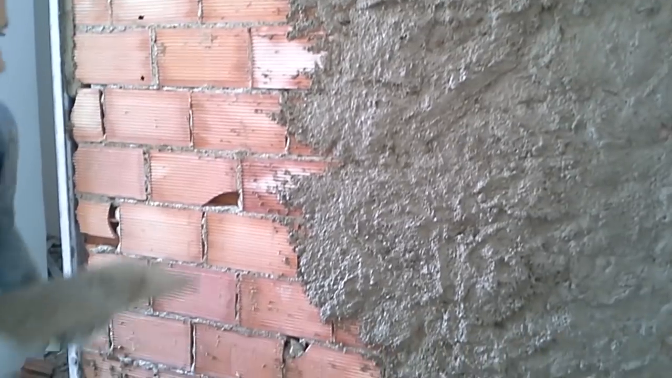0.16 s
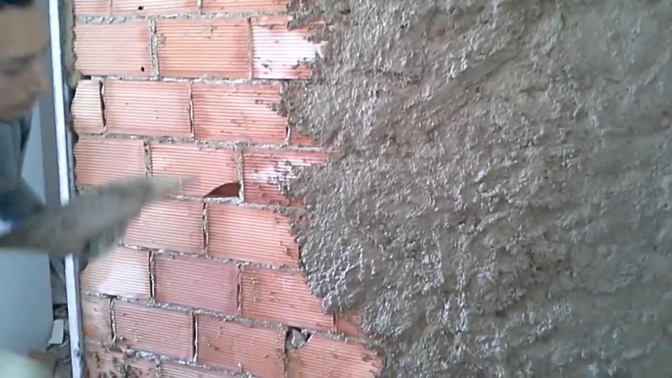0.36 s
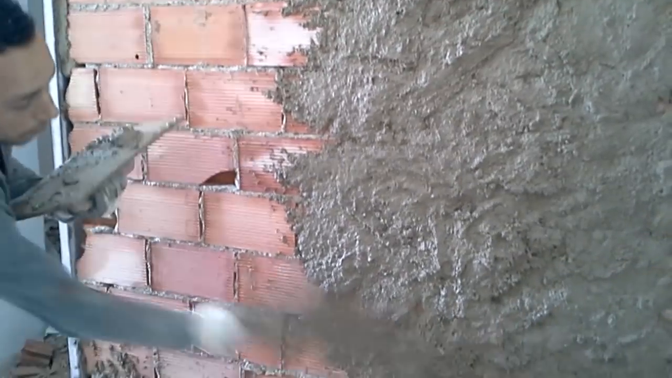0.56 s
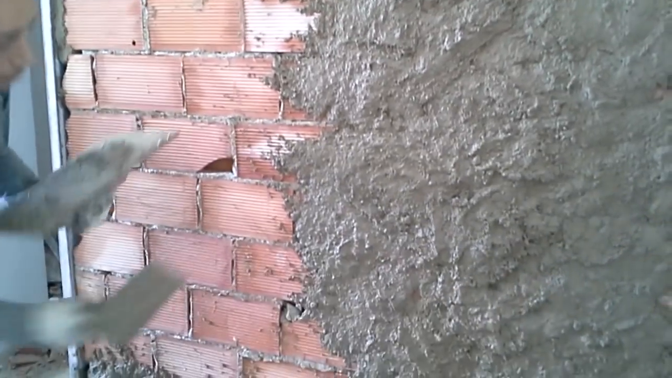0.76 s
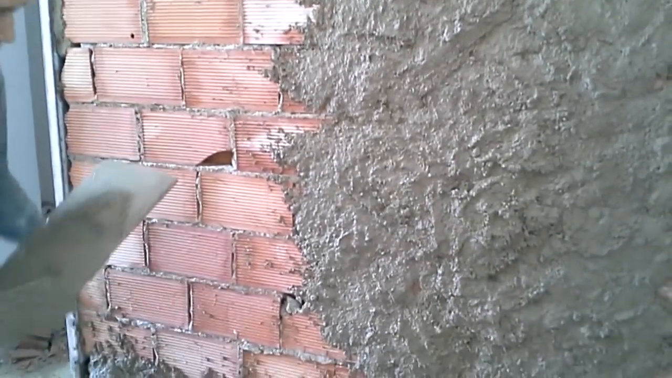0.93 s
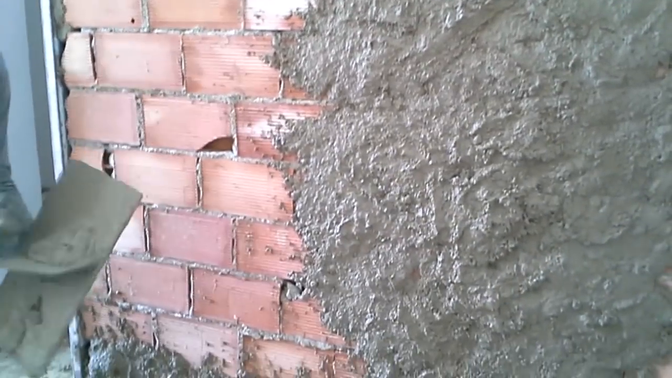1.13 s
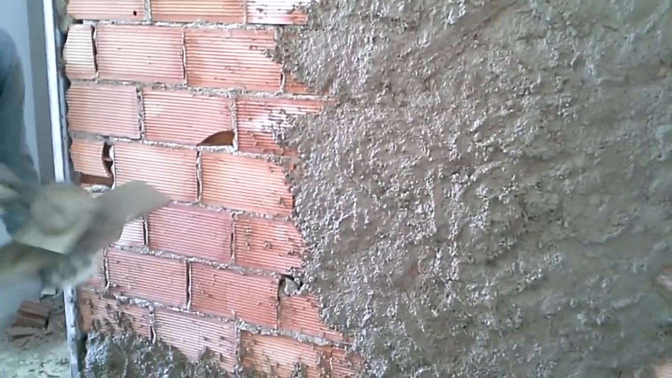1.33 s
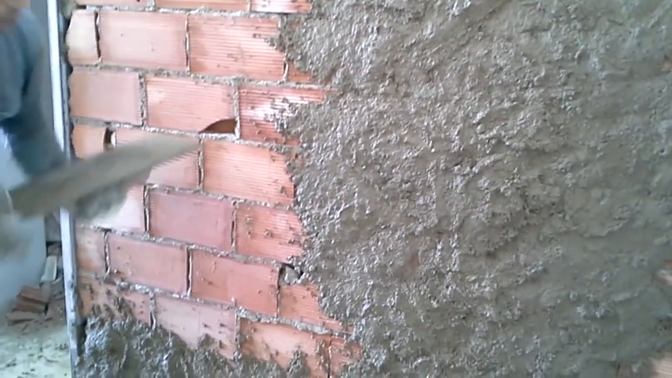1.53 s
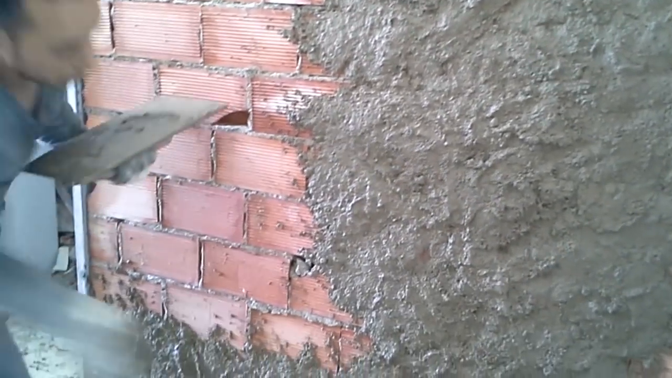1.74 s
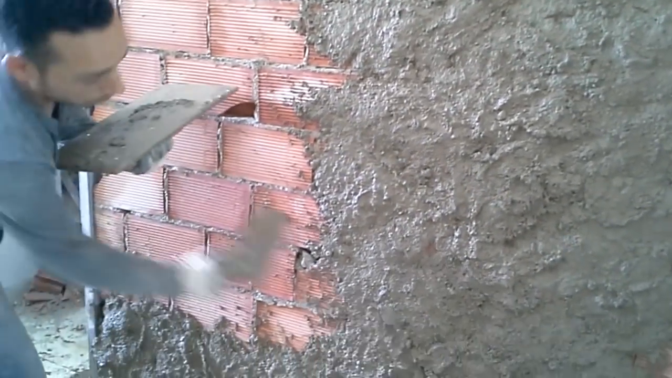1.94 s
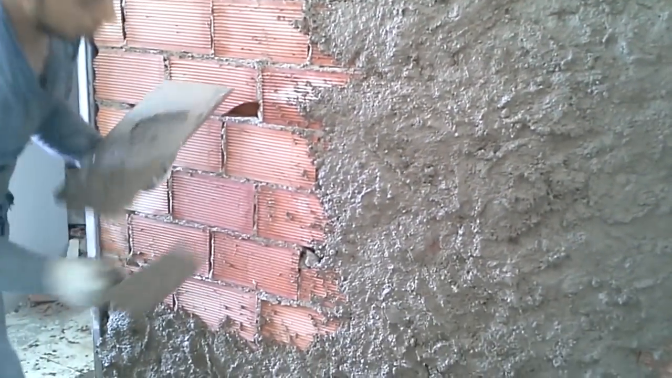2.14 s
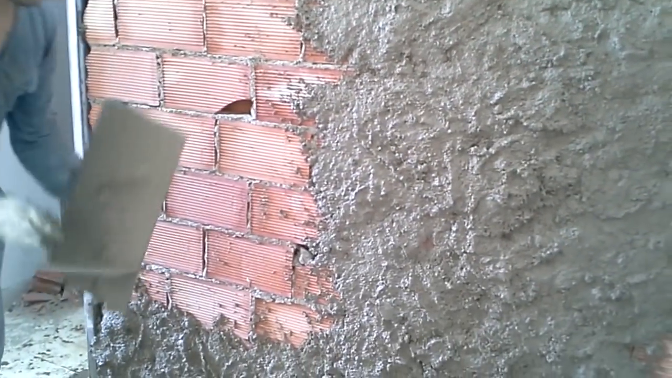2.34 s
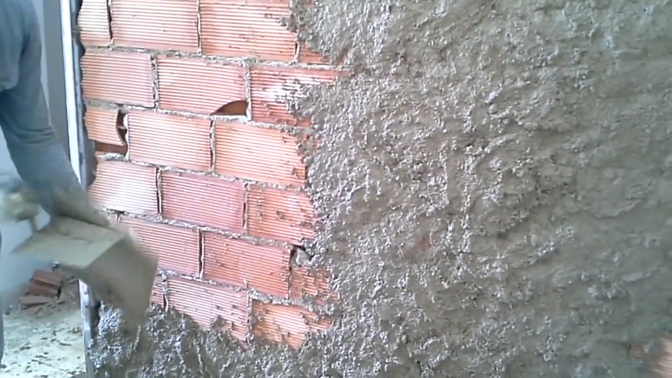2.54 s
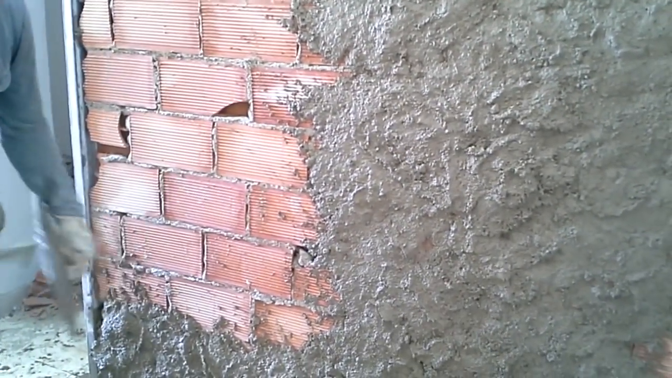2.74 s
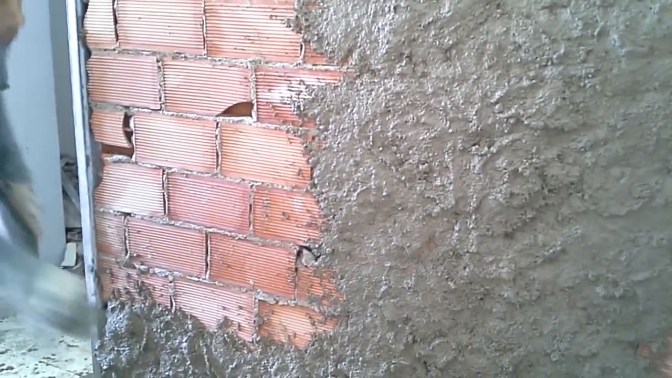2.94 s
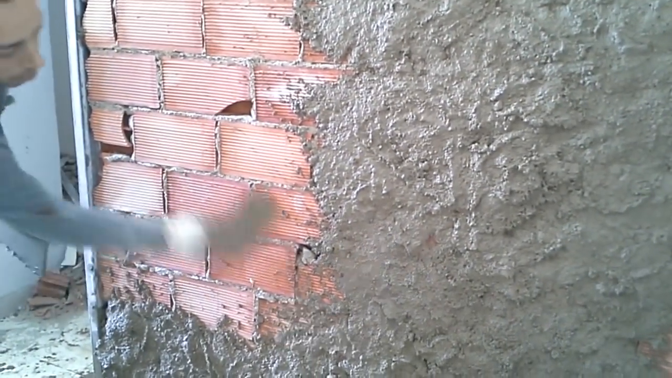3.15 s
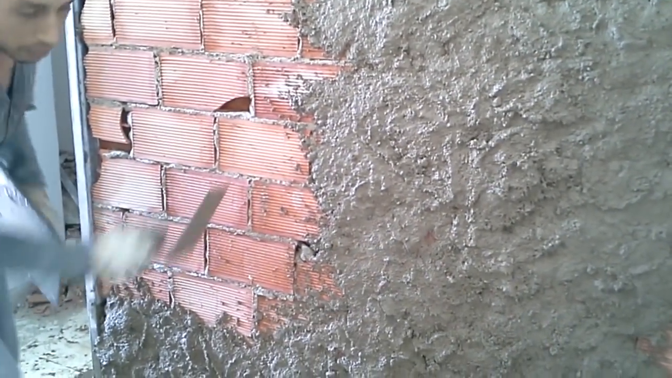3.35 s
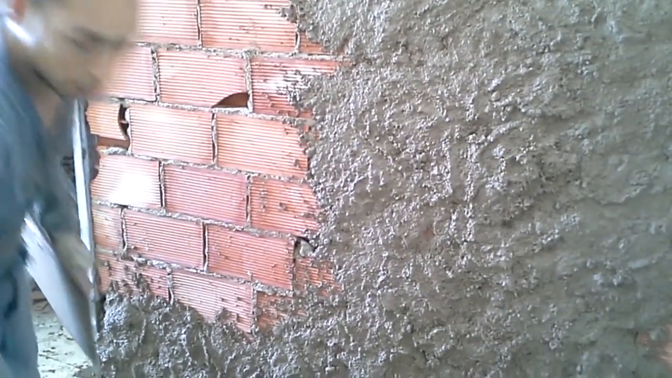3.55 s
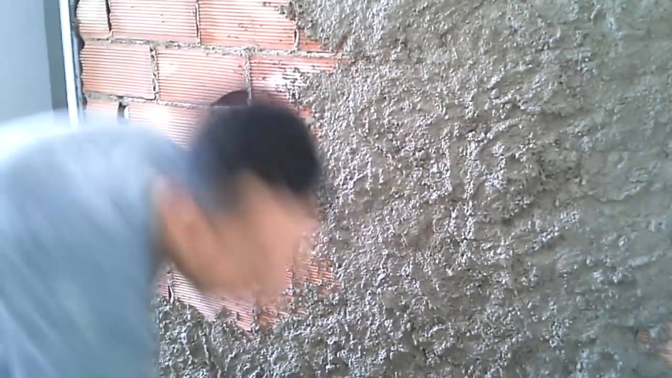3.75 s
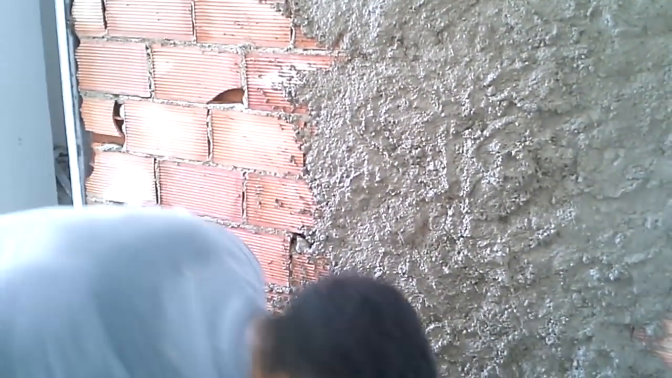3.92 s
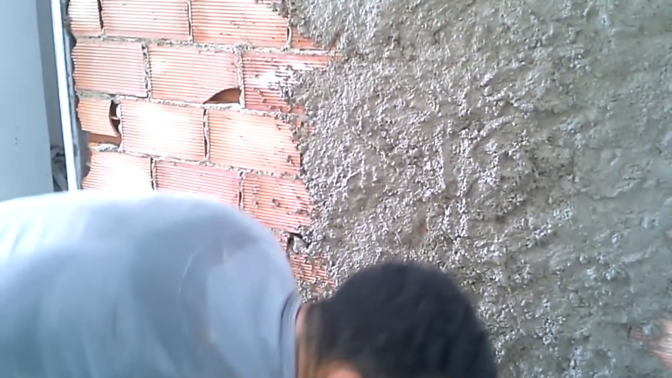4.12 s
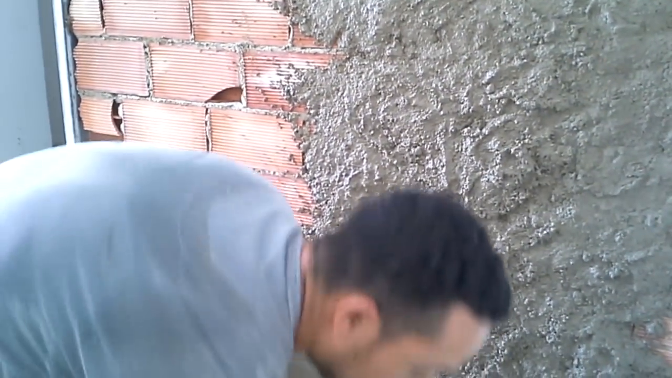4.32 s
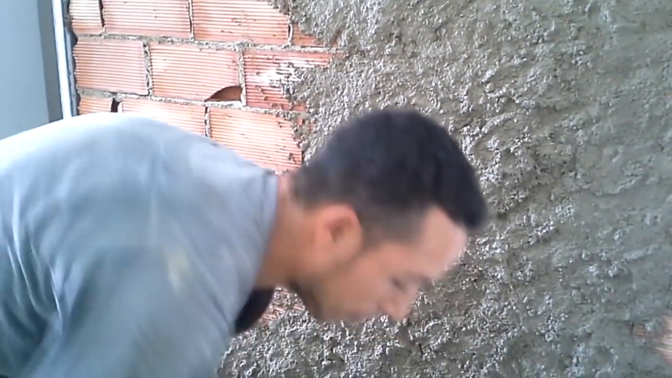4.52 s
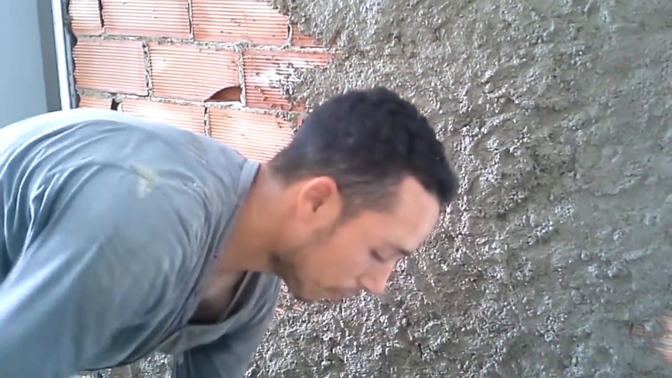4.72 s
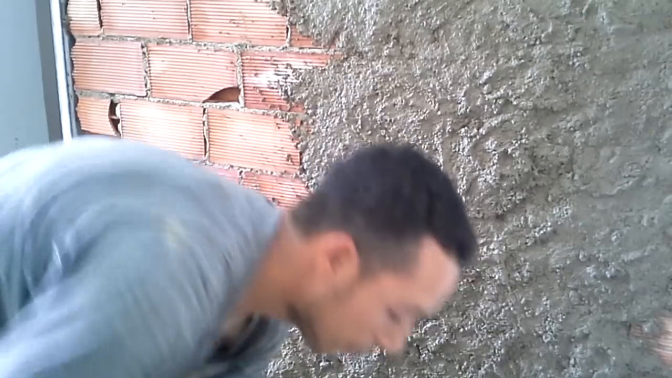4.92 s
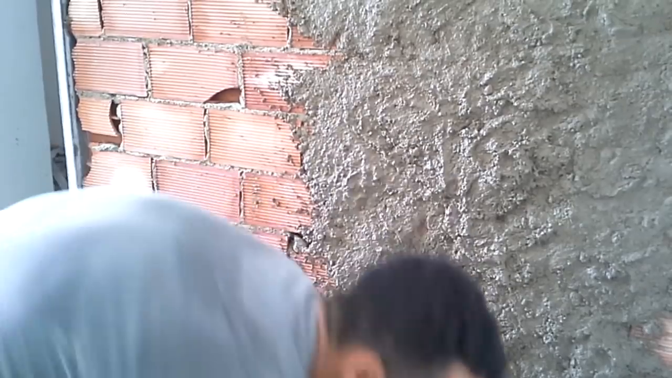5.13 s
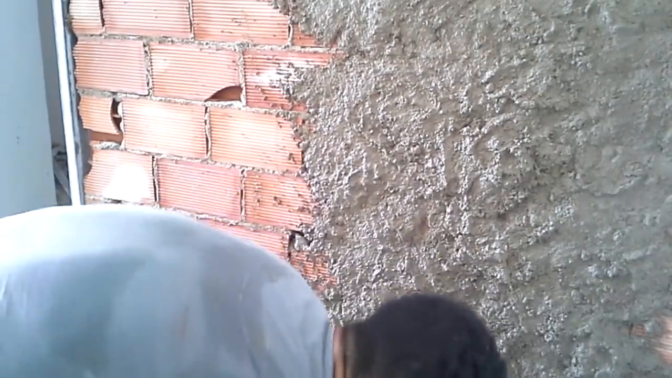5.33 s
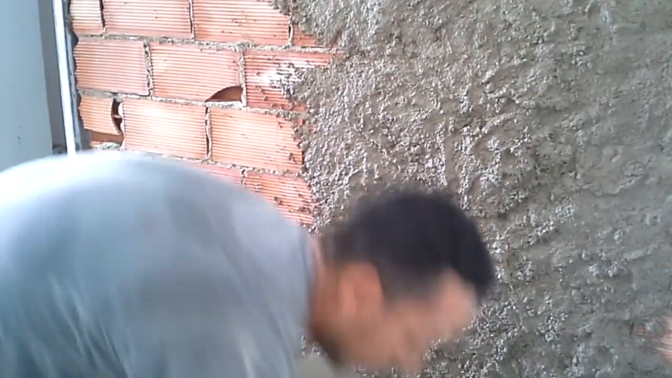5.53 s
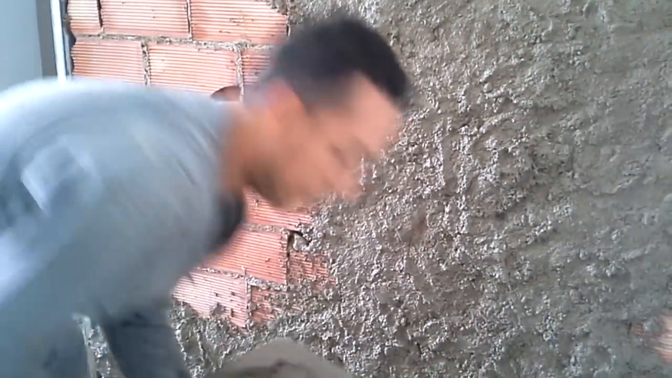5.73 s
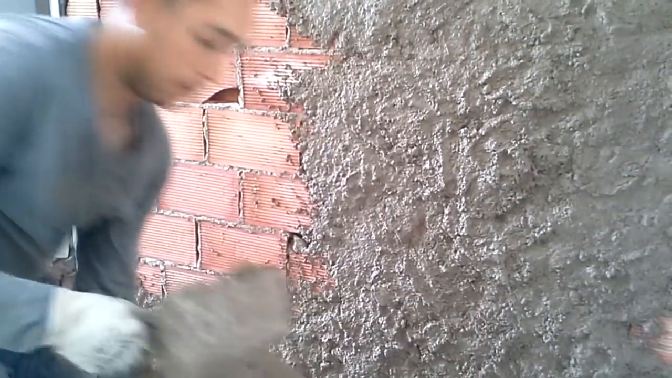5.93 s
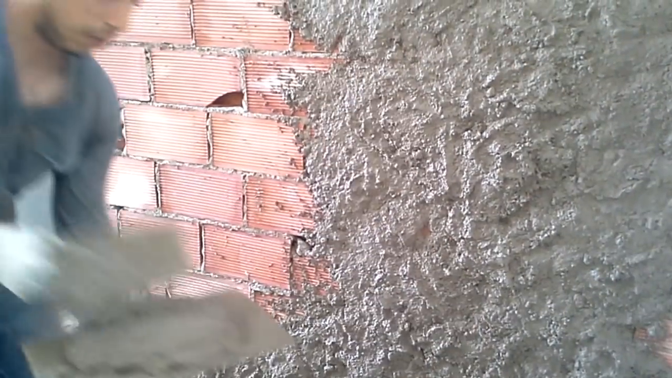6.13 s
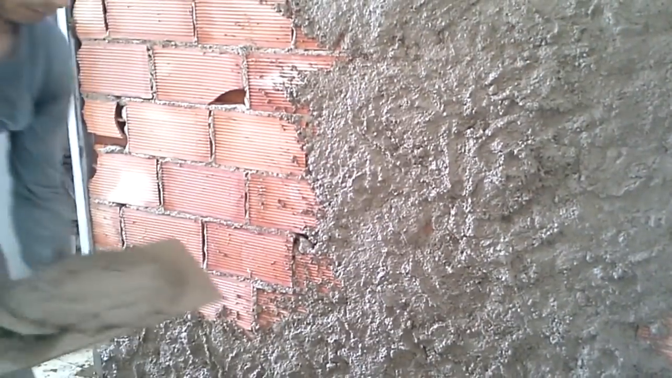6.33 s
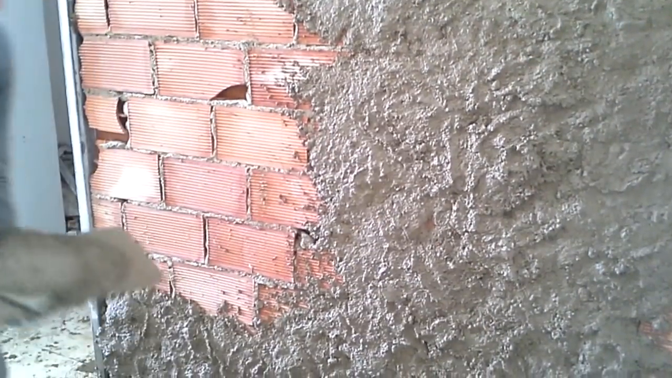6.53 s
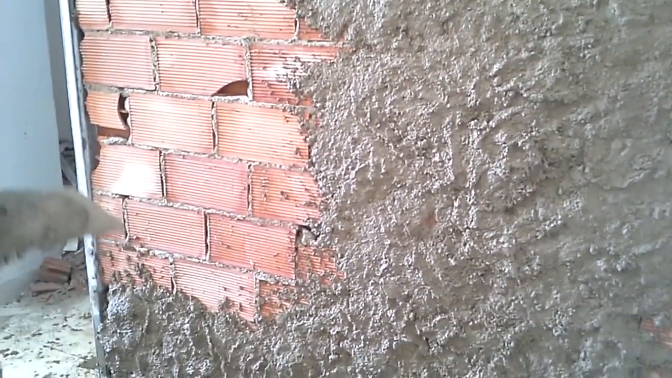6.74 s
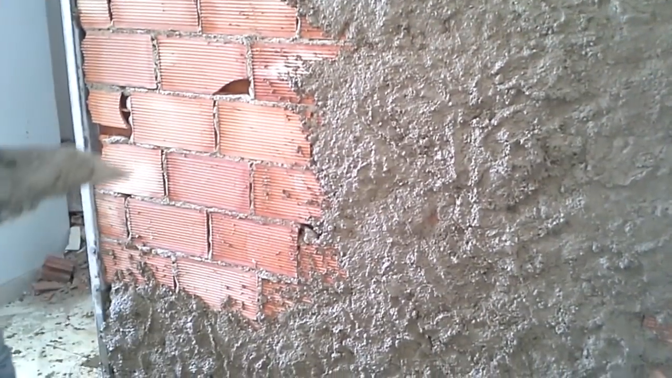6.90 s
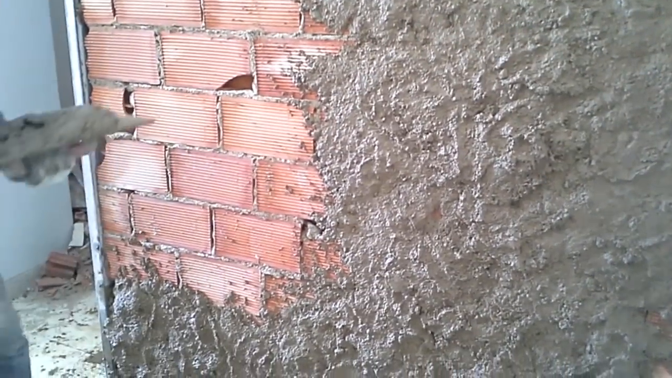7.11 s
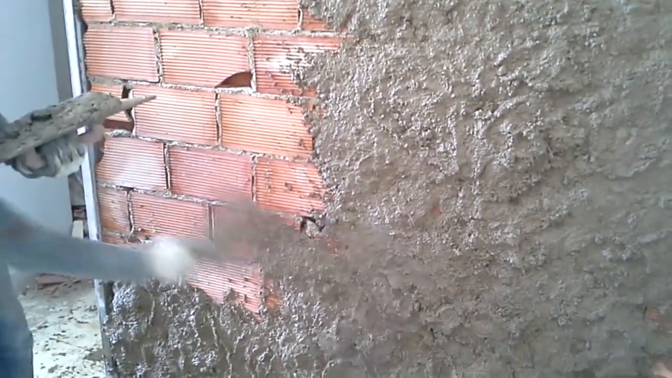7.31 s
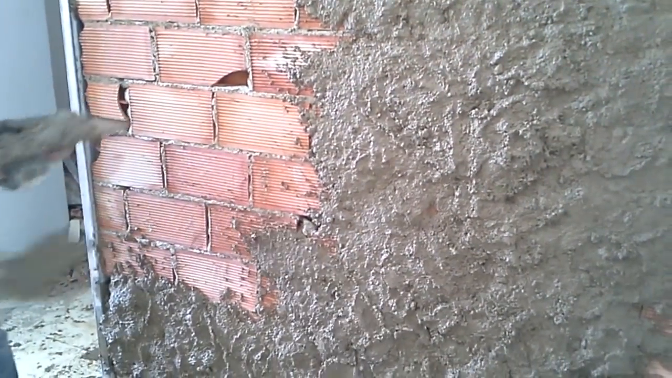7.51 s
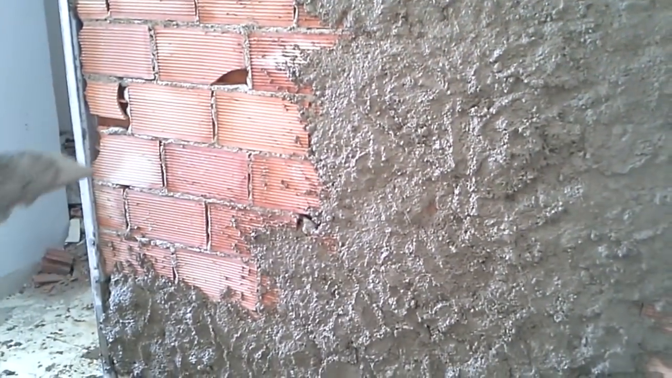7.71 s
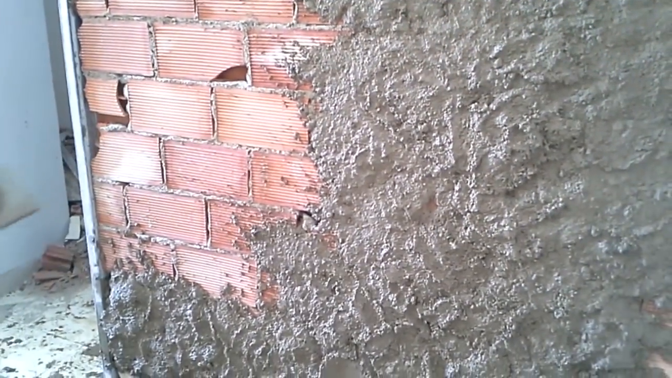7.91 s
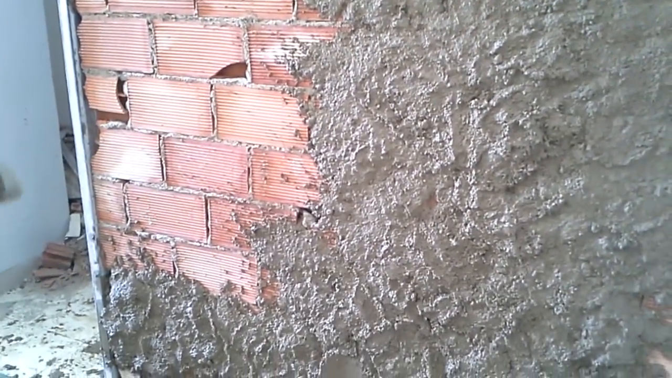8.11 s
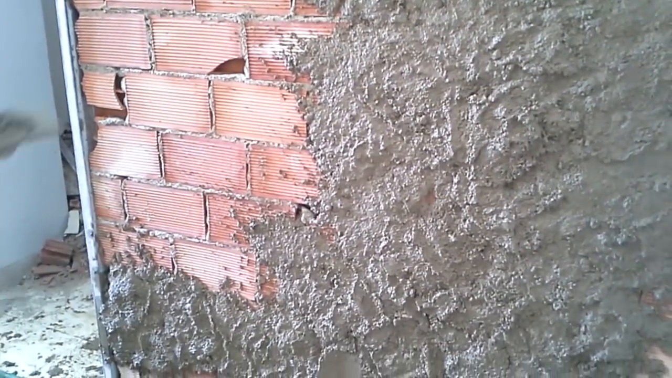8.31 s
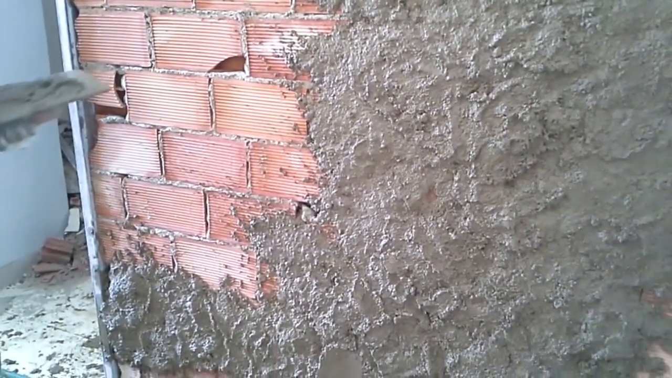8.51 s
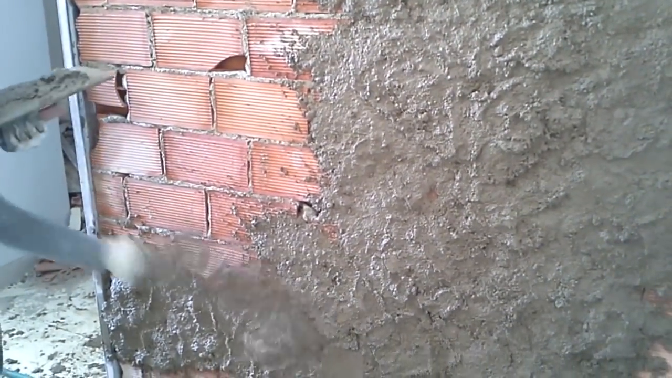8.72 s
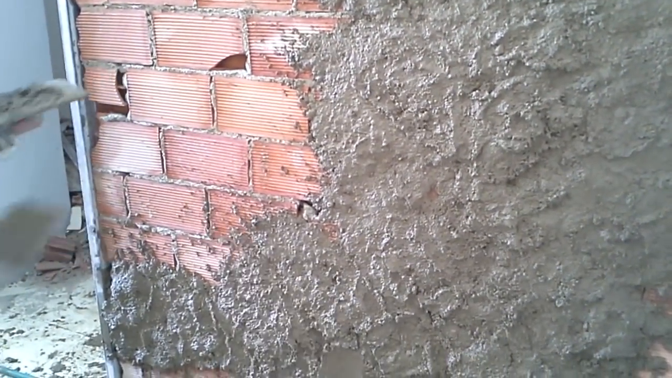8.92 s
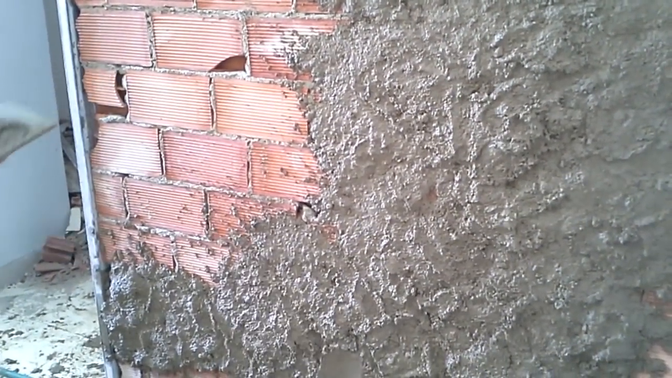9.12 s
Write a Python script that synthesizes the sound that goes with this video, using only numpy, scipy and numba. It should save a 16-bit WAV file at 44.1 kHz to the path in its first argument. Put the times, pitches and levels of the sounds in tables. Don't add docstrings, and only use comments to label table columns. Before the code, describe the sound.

A bare, hard-walled room with lively half-second echo, heard close on a stereo phone over soft low site noise and hiss. At 0.1 s a sharp wet slap of cement hits brick, with a low wall thud and fine spatter. A knock and gritty steel scoop with a squeak come at 0.55, another slap at 1.4, a hard double knock and scrape at 1.9, and a lighter throw at 2.6. From 3.1 to 6.2 no throws: trowel and hawk clunk on the bucket, mortar slops around 3.4 and 4.8, clothes and shoes shuffle faintly, and a loud knock with patter lands at 5.85. Faint drags lead to the hardest, overloading slap at 6.8. Clicks and a long bright scrape at 7.1-7.5 end in a shrill squeak. The last slap lands at 8.25, then a softer scrape and knocks near 8.8, fading to a faint rustle by 9.2.

```python
import sys
import numpy as np
from scipy import signal
from scipy.fft import rfft, irfft
from scipy.io import wavfile
from scipy.ndimage import uniform_filter1d
from numba import njit

SR = 44100
rng = np.random.default_rng(int(sys.argv[2]) if len(sys.argv) > 2 else 0)


def voltage_ratio(decibels):
    exponent = np.asarray(decibels, float) / 20
    return 10 ** exponent


def wrap_up_sound(samples):
    columns = np.atleast_2d(samples).T
    tamed = np.clip(columns, -1, 1)
    steps = np.round(tamed * 32767).astype(np.int16)
    wavfile.write(sys.argv[1], SR, steps)


N = 408366

# (time [s], peak [dB], wall thump [dB], wall boom [dB], splat body [dB])
THROWS = [
    (0.0879, -4.5, -20, -8.5, -12),
    (1.3886, -6, -20.5, -8.5, -16.5),
    (2.6231, -14, -26, -7.5, -11.5),
    (6.822, 1.5, -27.5, -14.5, -14),
    (8.2467, -3.5, -26, -5, -13),
]
# (frequency [Hz], level [dB])
SPLAT = [(120, -36.5), (200, -9), (1850, 1), (2750, -7), (3880, -7), (13300, -28.5), (15100, -18.5)]
# (frequency [Hz], level [dB], time to fall 60 dB [s])
WALL = [(82.8, -5.5, 0.74), (160.7, -9.5, 0.7)]
SPRAY_DB, SPRAY_FOLLOWS = -6.5, 0.34


def throws():
    s, db, thump_db, boom_db, body_db = np.transpose(THROWS)
    each = np.ones(len(s))

    def wet(level_db, length_s, lo_hz, hi_hz):
        grains = scatter(s, level_db, length_s * each)
        return band(colour(grains, SPLAT), lo_hz, hi_hz)[1]

    slap = wet(db, 0.0085, 1160, 3370)
    body = wet(db + body_db + 12.0, 0.012, 340, 1114)
    spray = wet(SPRAY_DB + SPRAY_FOLLOWS * db, 0.017, 3150, 12200)
    boom = band(scatter(s, db + boom_db - 0.5, 0.014 * each), 115, 328)[1]
    crumbs = blows(s + 0.038, db - 31.5, 0.078 * each) * band(sand(2.0), 700, 8100)
    t, wall = np.arange(SR) / SR, 0
    for hz, level_db, t60 in WALL:
        push_db = thump_db if hz < 110 else boom_db
        push = blows(s, db + push_db - 27.0, 0.0013 * each)
        note = voltage_ratio(level_db - 60 * t / t60) * np.sin(2 * np.pi * hz * t)
        wall = wall + signal.fftconvolve(push, note)[:N]
    return room(slap + body + spray + boom + crumbs, -5.0, 1.1, 0.0037) + wall


GATHER_S = 0.0013


def scatter(times, peak_db, length):
    size = 8192
    t, out = np.arange(size) / SR, np.zeros((2, N + size))
    push = voltage_ratio(peak_db)[:, None] * (1 - np.exp(-t / GATHER_S)) * np.exp(-t / length[:, None])
    x = rng.standard_normal(push.shape)
    for _ in range(4):
        x = x * push / np.sqrt(abs(uniform_filter1d(x ** 2, size=24)) + 1e-15)
        even = rfft(x, 2 * size)
        x = irfft(even / abs(even))[:, :size]
    out[0] = rng.standard_normal(N + size)
    for s, grains, p in zip(times, x, push):
        gain = np.sqrt(np.sum(p ** 2) / np.sum(grains ** 2))
        out[1, int(s * SR):int(s * SR) + size] += grains * gain
    return out[:, :N]


def blows(times, peak_db, length):
    out, t = np.zeros(N + SR), np.arange(SR // 2) / SR
    for s, db, fall_s in zip(times, peak_db, length):
        i = int(s * SR)
        out[i:i + len(t)] += voltage_ratio(db) * (1 - np.exp(-t / .001)) * np.exp(-t / fall_s)
    return out[:N]


# (time [s], peak [dB], body [dB], spray [dB], body pitch [Hz])
KNOCKS = [(0.552, -14, 12, -17, 615), (1.083, -34, -7, -27, 875), (1.8841, -18, 12, 0, 490),
          (1.921, -9.5, 8, -2, 767), (6.704, -28, -5, -19, 1030), (7.047, -30, 16, 17.5, 380),
          (7.143, -19, 6.5, -21, 750), (7.267, -29.5, -8, -1, 821), (7.36, -20, -23, 1, 1060),
          (7.475, -15, 11, -15, 900), (7.877, -19, -26, -23, 1045), (8.638, -31, 0, -8, 824),
          (8.6942, -41, -12, 11, 200), (8.761, -17, 1.5, -5.5, 826), (8.865, -19, -3, 1, 830),
          (3.092, -35, -22, -20, 990), (3.413, -18.5, 12, -2, 287), (3.497, -25.5, 11, 0, 330),
                 (3.691, -35, 17, -11, 649), (4.112, -27, -14, -27, 1100), (4.137, -28.5, 10, -5, 607),
                 (4.2116, -16.5, 4, -0.5, 604), (4.678, -26, 6.5, -9, 465), (4.712, -32, -14, 13, 1140),
                 (4.743, -14, -12, 1, 947), (4.823, -35, 16, -10, 314), (5.544, -20, -3, -7, 720),
                 (5.8438, -8.5, 0.5, -1, 770), (5.998, -20.5, -15, 0.5, 750), (6.081, -27.5, -6.5, 4, 775)]


def knocks():
    s, db, body_db, spray_db, hz = np.transpose(sorted(KNOCKS))
    contact_s = np.full(len(s), 0.0024)
    grain = sand(0.43)
    grain = grain / grain.std()
    tick = band(scatter(s, db + 10.0, 0.57 * contact_s), 800, 5060)[1]
    spray = band(scatter(s + .002, db + spray_db + 6.5, 0.7 * contact_s), 3000, 9900)[1]
    push = blows(s, db + body_db, 0.3 * contact_s) * (1 + 2.14 * grain)
    latest = np.searchsorted(s * SR, np.arange(N)) - 1
    pitch = hz[np.maximum(latest, 0)]
    boom = svf(svf(push, pitch, 1.1), pitch, 1.03)
    boom = signal.sosfilt(signal.butter(4, 190, "highpass", fs=SR, output="sos"), boom)
    return tick + spray + voltage_ratio(20.5) * boom + voltage_ratio(3.0) * steel(push)


# (frequency [Hz], width [Hz], level [dB])
TROWEL = [(640, 30, 0), (765, 30, -8), (920, 35, -2), (1130, 40, -7), (1500, 40, -1), (2060, 40, -7),
          (2870, 45, -8), (4000, 60, -11), (4750, 50, -11)]


def steel(x):
    f, width, db = np.transpose(TROWEL)
    gain = voltage_ratio(db) * np.sqrt(SR / (np.pi * width * np.sum(voltage_ratio(2 * db))))
    ring = np.zeros(N)
    for k in range(len(f)):
        ring += (-1) ** k * gain[k] * svf(x, np.full(N, f[k]), f[k] / width[k])
    return ring


# (start [s], length [s], grit [dB], body [dB], grit centre [Hz])
SCOOPS = [
    (0.556, 0.09, -17, 1, 1700),
    (1.89, 0.094, -16, 2, 2080),
    (4.714, 0.05, -20.5, -8.5, 2960),
    (7.365, 0.16, -15, -7.5, 3430),
    (8.775, 0.16, -23.5, -1, 2310),
]
# (start [s], length [s], grit [dB], body [dB], grit centre [Hz])
DRAGS = [(1.95, 0.13, -20, -20, 2330), (3.095, 0.16, -44, -10, 2250), (3.225, 0.2, -46, -11.5, 2250),
         (4.14, 0.046, -42, 1, 2200), (5.28, .12, -43.5, -10.5, 3830), (5.39, 0.1, -43, -6.5, 3230),
         (6.0, 0.06, -36, -4.5, 3800), (6.085, 0.038, -43, -9, 3800), (6.16, 0.072, -42, -5.5, 3870),
         (6.47, .11, -46, -3, 1960), (6.57, 0.12, -48, -11, 3020), (6.71, 0.12, -45, -4, 4100),
         (7.27, 0.067, -43.5, 0, 3360), (7.82, 0.03, -35, -11, 2900), (7.885, 0.2, -43.5, -11, 2200),
         (8.01, 0.026, -48.5, 6, 2900), (8.1, 0.092, -34.5, -12.5, 4670)]
# (start [s], length [s], grit [dB], body [dB], grit centre [Hz])
SLOPS = [
    (3.415, 0.091, -24, 2.4, 2230),
    (3.53, 0.1, -36, 1.2, 2250),
    (3.68, 0.17, -35.5, 9.1, 2080),
    (4.83, 0.14, -39, 8.2, 2030),
    (7.15, 0.093, -38.5, 4.4, 2910),
]
# (start [s], length [s], grit [dB], body [dB], grit centre [Hz])
SPATTERS = [
    (1.088, 0.23, -51, -6, 3000),
    (4.215, 0.072, -25.5, -8, 3270),
    (5.14, 0.075, -42.5, -3.5, 2300),
    (5.55, 0.15, -33, -6.5, 3000),
    (5.85, 0.11, -20.5, -2, 2730),
    (7.04, 0.085, -26.5, -3, 4150),
]
# (start [s], length [s], grit [dB], body [dB], grit centre [Hz])
SHUFFLES = [(0.0, 0.033, -40, -12, 3900), (.84, 0.3, -56, -12, 4860), (5.19, 0.065, -52, -6, 2990),
            (.34, 0.44, -47, -7, 3500), (2.33, 0.19, -48, -5, 4000), (3.97, 0.3, -49.5, -16, 3670),
            (4.48, 0.043, -48.5, -26, 3700), (4.58, 0.12, -48.5, -5, 4400), (8.56, .19, -50.5, -2.5, 3300),
            (9.05, .21, -47, -10, 4300)]
# (frequency [Hz], level [dB])
GRIT = [(2940, -69), (5000, 11), (12200, 1), (14500, -6), (15100, -45.5)]
SCOOP = dict(rise=0.56, start_db=-6.5, end_db=-7.5, sizzle_db=-10.5, body_hz=767, sing=0.091, focus=0.3)
DRAG = dict(rise=0.033, start_db=2.5, end_db=3, sizzle_db=-10, body_hz=720, sing=0.03, focus=0.1)
SLOP = dict(rise=0.044, start_db=4, end_db=-6, sizzle_db=-9.5, body_hz=413, sing=0.021, focus=0.39)
SPATTER = dict(rise=0.017, start_db=8.5, end_db=-19.5, sizzle_db=-6.5, body_hz=687, sing=0.027, focus=0.12)
SHUFFLE = dict(rise=0.71, start_db=-4.5, end_db=-1.5, sizzle_db=-16, body_hz=650, sing=.05, focus=0.31)
SWISH = dict(rise=0.65, start_db=-24.5, end_db=-6.5, sizzle_db=1.5, body_hz=800, sing=.05, focus=0.15)
SWISH_S, SWISH_DB, SWISH_HZ = 0.072, -35, 3650
SWISH_WEAK_DB = 4


def scrapes():
    swishes = [(s - SWISH_S, SWISH_S, SWISH_DB - SWISH_WEAK_DB * (db < -6), -9, SWISH_HZ)
               for s, db, *_ in THROWS]
    kinds = ((SCOOPS, SCOOP), (DRAGS, DRAG), (SLOPS, SLOP), (SPATTERS, SPATTER), (SHUFFLES, SHUFFLE),
             (swishes, SWISH))
    power = np.zeros((3, N))
    shape = np.ones((4, N)) * [[3000], [700], [0], [0]]
    for rows, how in kinds:
        for s, length, db, body_db, grit_hz in rows:
            first = int(s * SR)
            push_db = db + stroke(length, how["rise"], how["start_db"], how["end_db"])
            push = voltage_ratio(2 * push_db)[:N - first]
            i = first + np.arange(len(push))
            sing = np.clip(how["sing"] * voltage_ratio(body_db), 0, .9)
            form = [grit_hz, how["body_hz"], sing, how["focus"]]
            shape[:, i[push > power[0, i]]] = np.c_[form]
            power[:, i] += push * voltage_ratio(2 * np.c_[[0, body_db, how["sizzle_db"]]])
    smooth = np.sqrt(abs(uniform_filter1d(power, SR // 300)))
    rasp, body, sizzle = smooth * judder(90, 0.96)
    grit_hz, body_hz, ring, focus = shape
    grain = sand(1.94)
    grit, boom = band(grain, 1440, 6480), band(grain, 195, 1160)
    grit = np.sqrt(1 - focus ** 2) * grit + 1.7 * focus * svf(grit, grit_hz, 3.)
    boom = .4 * boom + 1.4 * svf(boom, body_hz, 1.8)
    sung = steel(ring * np.hypot(body, rasp) * grain / grain.std())
    fine = sizzle * band(colour(grain, GRIT), 4860, 20200)
    return np.sqrt(1 - ring ** 2) * (rasp * grit + body * boom) + sung + fine


RELEASE_DB_PER_S = 897


def stroke(length, rise, start_db, end_db):
    t = np.arange(int((length + .08) * SR)) / SR
    held = np.interp(t, [0, rise * length, length], [start_db, 0, end_db])
    return held - RELEASE_DB_PER_S * np.maximum(t - length, 0)


def sand(spread_db):
    return rng.standard_normal(N) * voltage_ratio(spread_db * np.minimum(rng.exponential(size=N), 6))


def judder(rate_hz, depth_db):
    k = int(SR / rate_hz)
    steps = np.repeat(rng.standard_normal(N // k + 1), k)
    return voltage_ratio(depth_db * uniform_filter1d(steps, k // 3)[:N])


# (start [s], length [s],
# pitch [Hz], level [dB], sharpness)
SQUEAKS = [(.554, 0.083, 650, -12.5, 8.4), (.556, 0.081, 1477, -18.5, 25), (.56, 0.05, 2886, -24, 35),
           (1.948, 0.23, 1060, -19.5, 3.1), (3.414, 0.035, 282, -22, 11), (3.5, 0.032, 330, -30, 2.1),
           (7.465, 0.022, 907, -11.5, 3.8), (8.858, 0.046, 837, -18, 10), (7.553, 0.14, 3240, -27, 3.7),
           (4.594, 0.11, 4800, -52, 6.7), (5.29, 0.044, 4200, -35.5, 3.7), (1.084, 0.043, 2900, -41.5, 1.8),
           (3.099, 0.067, 2130, -40, 4.4), (4.112, 0.021, 2340, -28, 1.9), (4.74, 0.032, 3520, -38, 1.8),
           (4.911, 0.047, 1950, -31.5, 2.2), (6.48, 0.06, 1940, -36, 3), (6.7, .08, 4330, -38.5, 9.2),
           (7.473, 0.043, 3920, -10.5, 9.4), (7.872, .025, 1890, -29, 3.7), (8.1, 0.16, 4600, -31.5, 49),
           (8.758, 0.024, 1500, -25, 6.6), (4.824, .05, 345, -24, 3.2)]
SQUEAK_EDGE_DB = -13.5


def squeaks():
    out = np.zeros(N)
    for s, length, hz, db, sharp in SQUEAKS:
        push = voltage_ratio(db + stroke(length, 0.14, SQUEAK_EDGE_DB, SQUEAK_EDGE_DB))
        tone, pitch = rng.standard_normal(len(push)), np.full(len(push), 1. * hz)
        for _ in range(2):
            tone = svf(tone, pitch, sharp * .64)
        out[int(s * SR):int(s * SR) + len(push)] += push * tone / tone.std()
    return out


# (frequency [Hz], time to fall 60 dB [s])
ROOM = [(60, 0.82), (160, 0.7), (420, 0.65), (1100, 0.57), (2900, 0.5), (7700, 0.56), (12000, 0.35)]
# (frequency [Hz], likeness [0-1])
PORTS_ALIKE = [(60, 1), (130, 0.86), (290, 0.83), (630, 0.77), (1390, 0), (3040, 0.09), (6670, 0.12),
               (14600, 0.01)]
# (frequency [Hz], left minus right [dB])
PORTS_TILT = [(60, 11.5), (110, -6.5), (200, -1), (370, -1), (690, -3), (1270, -0.5), (2340, 4),
              (4310, 11.5), (7940, 6.5), (14600, -2.5)]


def room(x, direct_db, early_db, early_s):
    size, hop, edge = 28000, 2048, 64
    t, hz = np.arange(size) / SR, np.fft.rfftfreq(2 * SR, 1 / SR)
    alike, tilt = read(PORTS_ALIKE, hz), voltage_ratio(read(PORTS_TILT, hz) / 2)
    ports = np.array([tilt, 1 / tilt]) / np.sqrt((tilt ** 2 + tilt ** -2 + 2 * alike) / 4)
    direct = voltage_ratio(direct_db) * np.roll(irfft(ports), edge, axis=1)[:, :2 * edge]
    mid, side = rfft(rng.standard_normal((2, 2 * SR))) * np.sqrt([1 + alike, 1 - alike]) / np.sqrt(2)
    centres = 44 * 2. ** np.arange(9)[:, None, None]
    share = np.cos(np.pi / 2 * np.clip(np.log2((hz + 1) / centres), -1, 1)) ** 2
    octaves = irfft(ports * [mid + side, mid - side] * share)
    fall = voltage_ratio(-60 * t / read(ROOM, centres)) + voltage_ratio(early_db) * np.exp(-t / early_s)
    fall *= np.clip((t - edge / SR) / 0.0017, 0, 1)
    fall /= np.sqrt(np.sum(fall ** 2, axis=-1, keepdims=True))
    places, length = [], 16 * hop
    for j in rng.integers(0, SR, size=24):
        paths = np.sum(octaves[..., j:j + size] * fall, axis=0)
        paths[:, :2 * edge] += [direct[0], np.roll(direct[1], j % 17 - 4)]
        places.append(rfft(paths, length))
    padded, out = np.pad(x, hop), np.zeros((2, N + 2 * SR))
    fade = np.sin(np.pi * np.arange(2 * hop) / (2 * hop))
    for k, i in enumerate(range(0, N + hop, hop)):
        piece = padded[i:i + 2 * hop]
        heard = rfft(piece * fade[:len(piece)], length) * places[k % len(places)]
        out[:, i:i + length] += irfft(heard)
    return out[:, hop + edge:hop + edge + N]


# (frequency [Hz], level [dB])
AIR = [(18, -41), (30, -44.5), (139, -5), (355, -7), (1170, -12.5), (9390, -20), (13900, -30.5),
       (15000, -16.5)]
# (time [s], level [dB])
AIR_DB = [(0.0, -40), (2.1, -43), (3.7, -40.5), (6.4, -44.5), (7.2, -34.5), (9.26, -47.5)]


def air():
    level_db = np.interp(np.arange(N) / SR, *np.transpose(AIR_DB)) - 11.0
    return voltage_ratio(level_db) * colour(rng.standard_normal(N), AIR)


def read(table, hz):
    f, v = np.transpose(table)
    return np.interp(np.log(hz + 1), np.log(f + 1), v)


def colour(x, table):
    gain = voltage_ratio(read(table, np.fft.rfftfreq(x.shape[-1], 1 / SR)))
    y = irfft(rfft(x) * gain, x.shape[-1])
    return y / y.std()


def band(x, lo_hz, hi_hz):
    y = signal.sosfilt(signal.butter(3, [lo_hz, hi_hz], "bandpass", fs=SR, output="sos"), x)
    return y / np.atleast_2d(y)[0].std()


@njit
def svf(x, hz, sharp):
    y, b, l, k = np.empty(len(x)), 0., 0., 1 / sharp
    for i in range(len(x)):
        g = np.tan(np.pi * hz[i] / SR)
        v = (b + g * (x[i] - l)) / (1 + g * (g + k))
        b, l, y[i] = 2 * v - b, l + 2 * g * v, k * v
    return y


def scene():
    return throws() + room(knocks() + scrapes() + squeaks() + air(), -6.5, 0.43, 0.02)


def low_pass(x):
    return signal.sosfilt(signal.butter(12, 15220, fs=SR, output="sos"), x)


def record(dry):
    x = signal.sosfilt(signal.butter(4, 72, "highpass", fs=SR, output="sos"), dry)
    x = signal.sosfilt(signal.ellip(8, .2, 60, 14600, fs=SR, output="sos"), x)
    return low_pass(np.clip(x, -1, 1))


dry = scene()
out = record(dry)
wrap_up_sound(out)
```